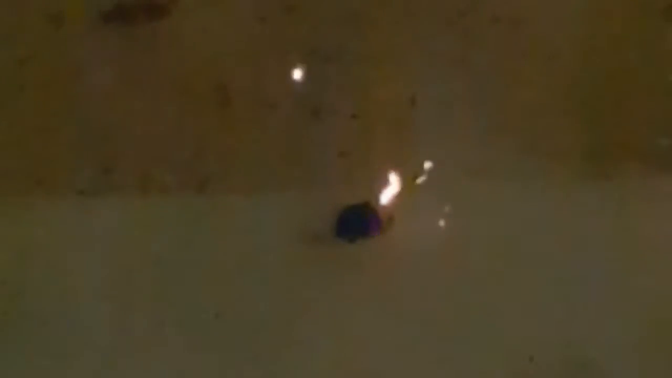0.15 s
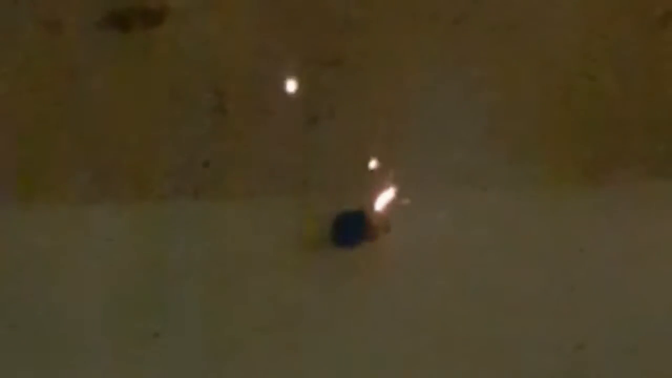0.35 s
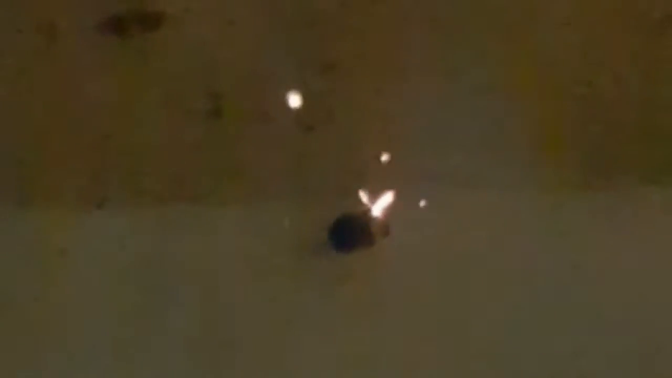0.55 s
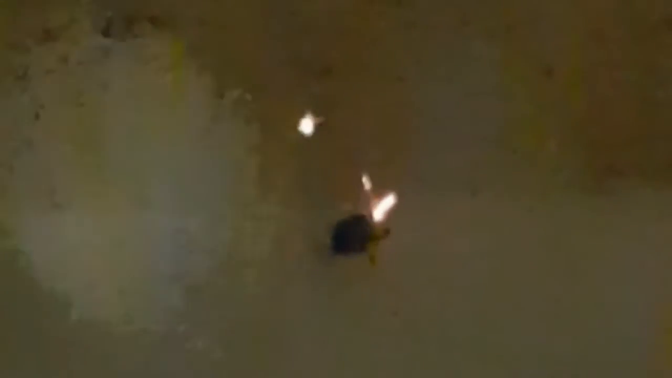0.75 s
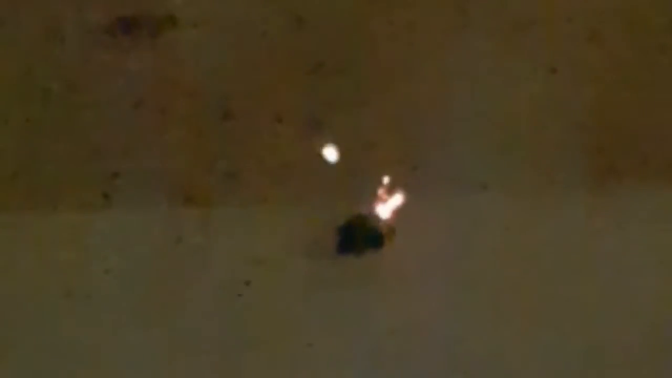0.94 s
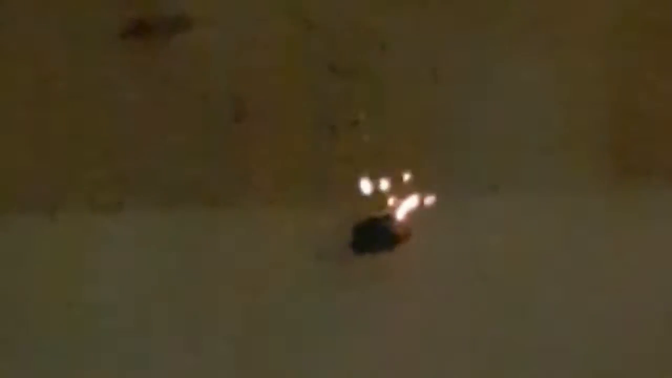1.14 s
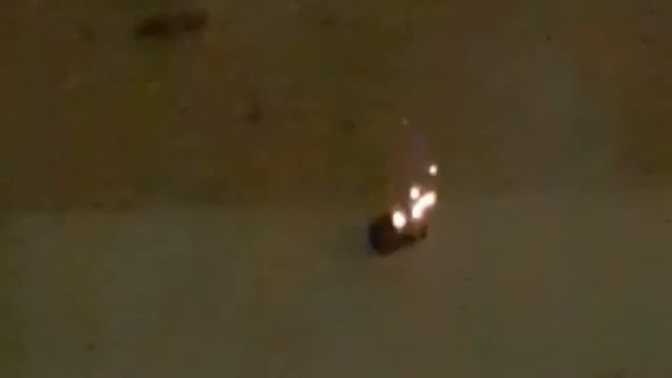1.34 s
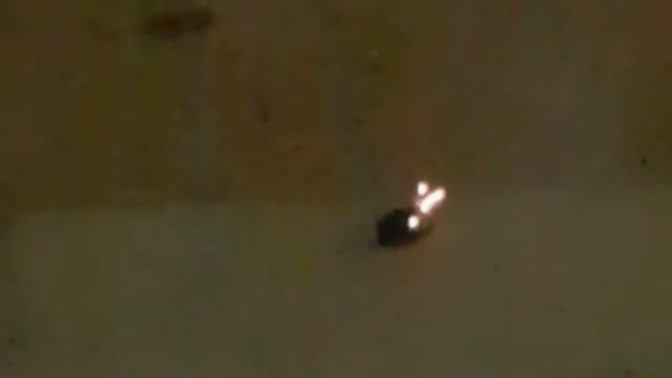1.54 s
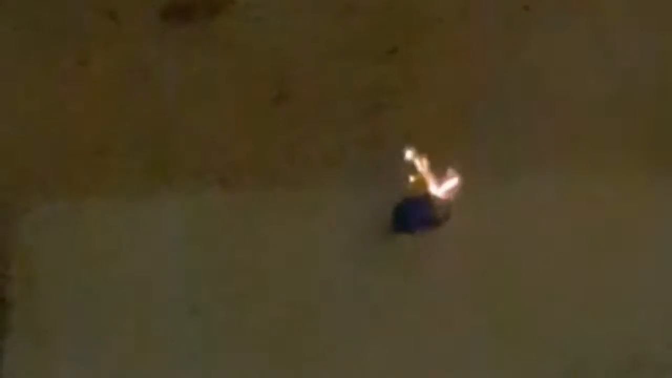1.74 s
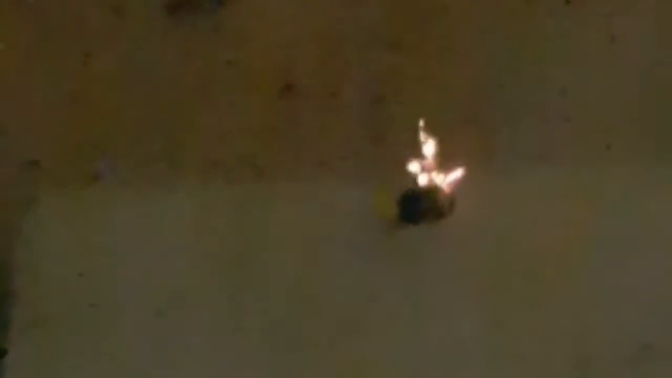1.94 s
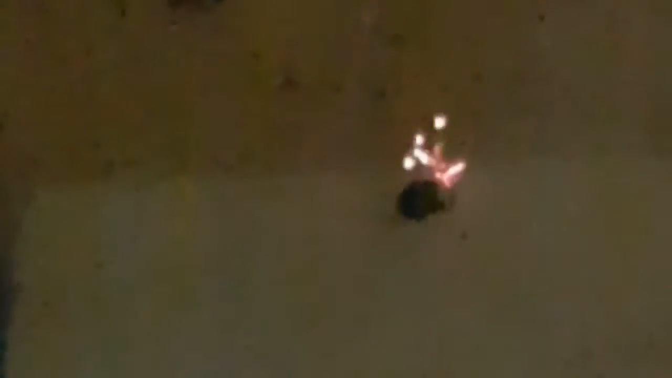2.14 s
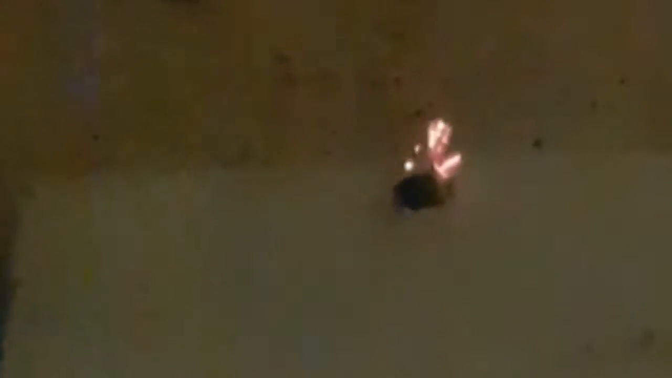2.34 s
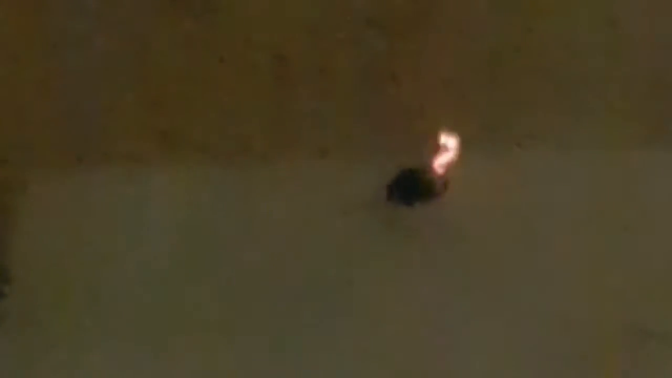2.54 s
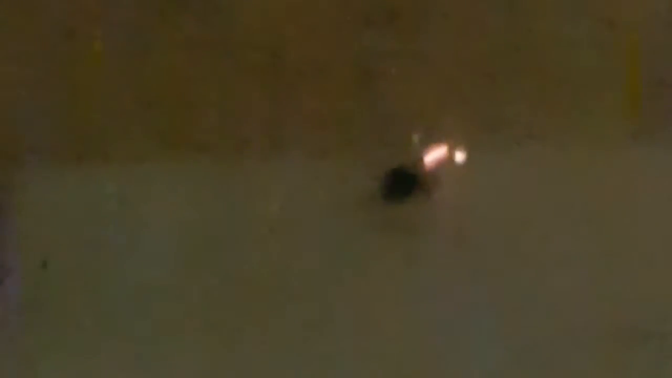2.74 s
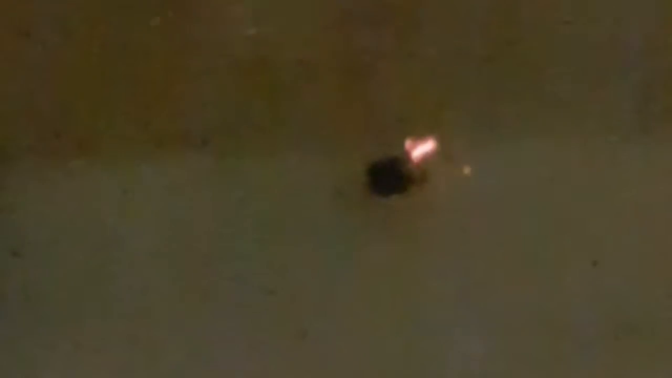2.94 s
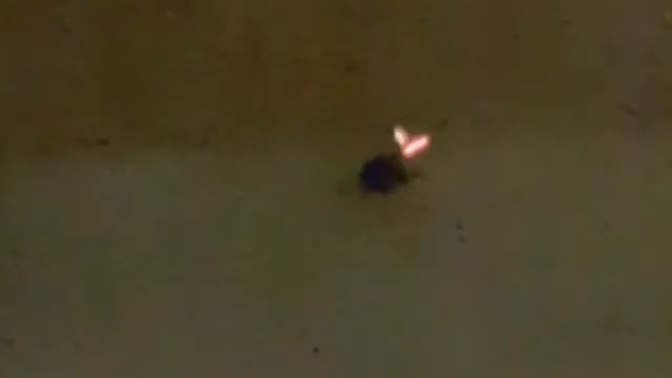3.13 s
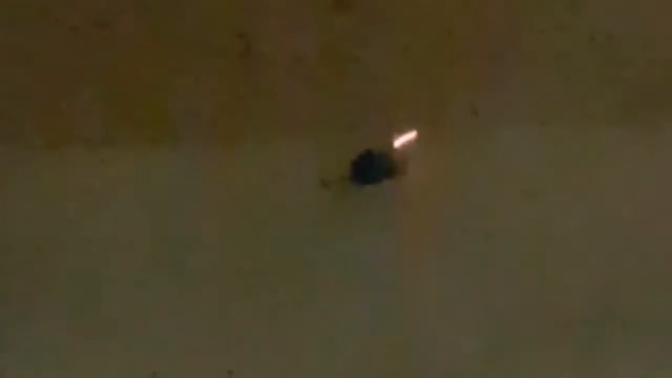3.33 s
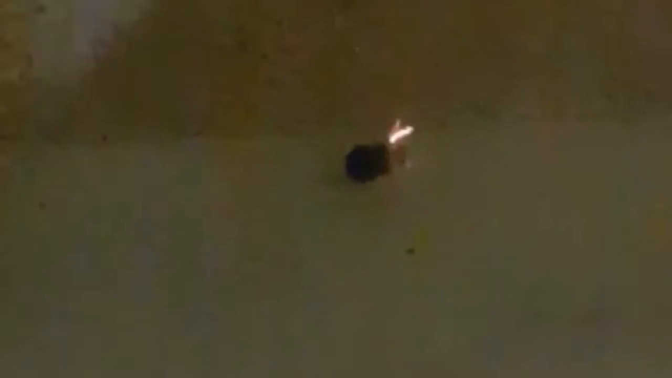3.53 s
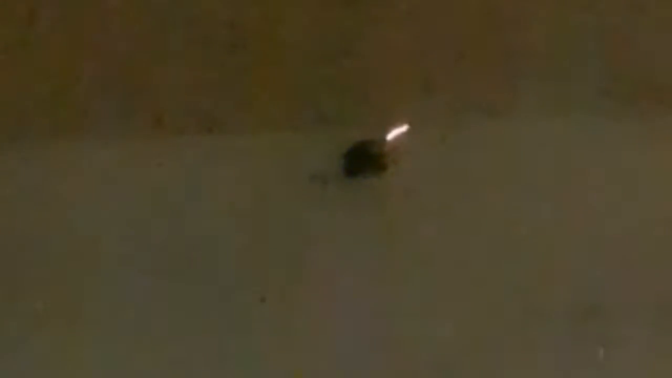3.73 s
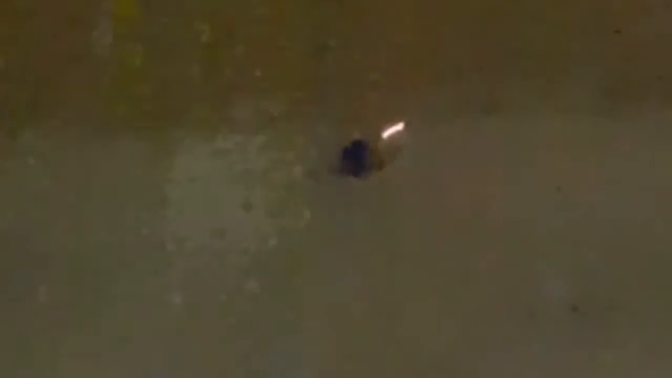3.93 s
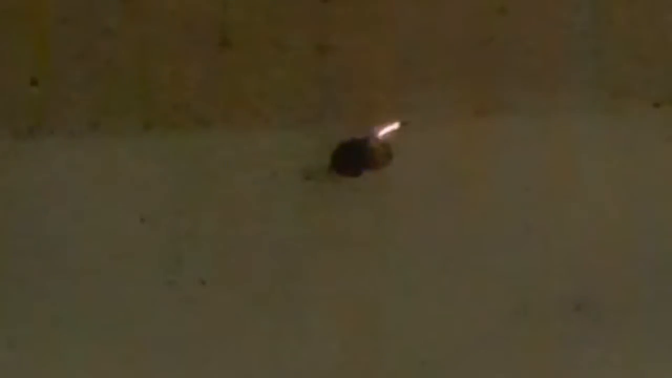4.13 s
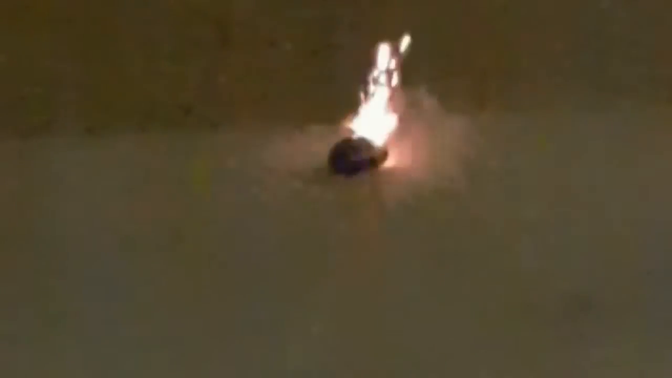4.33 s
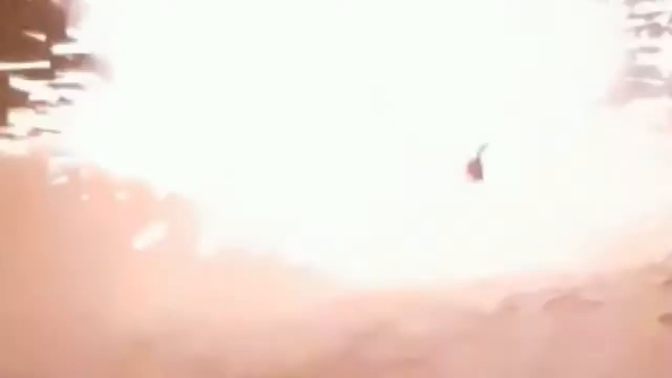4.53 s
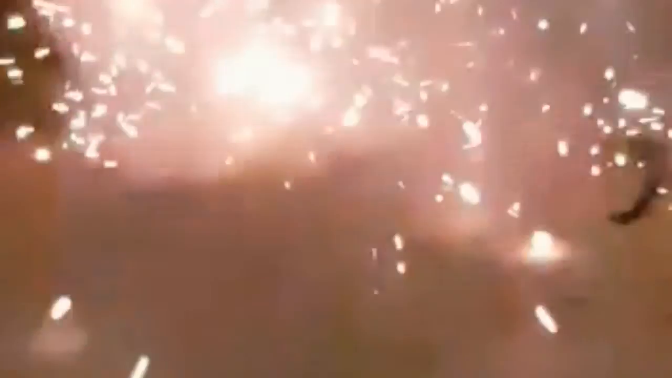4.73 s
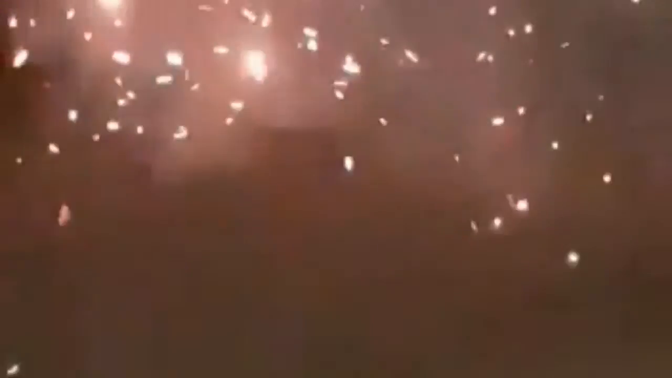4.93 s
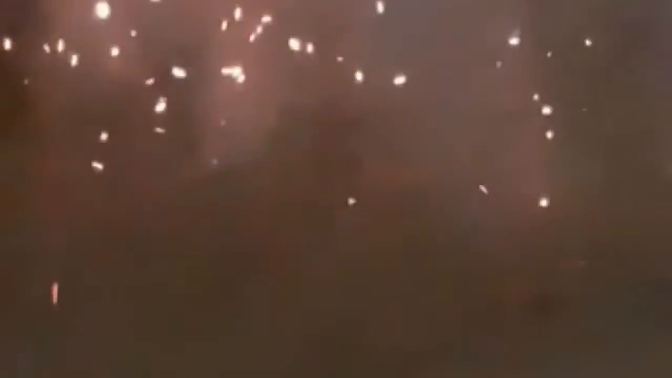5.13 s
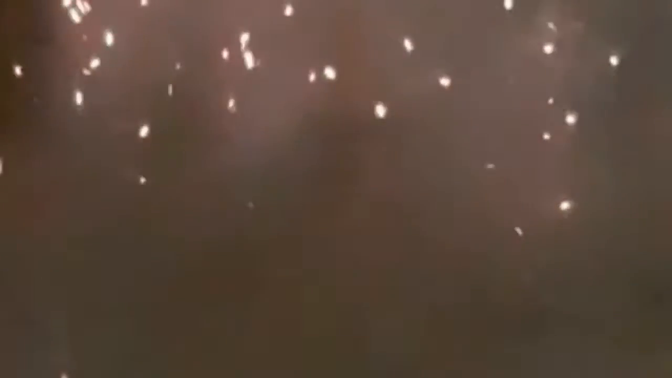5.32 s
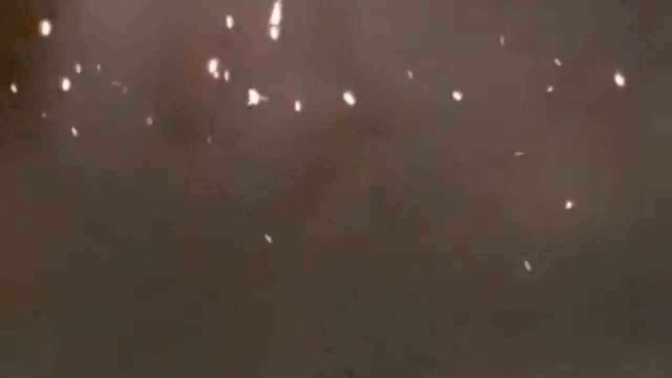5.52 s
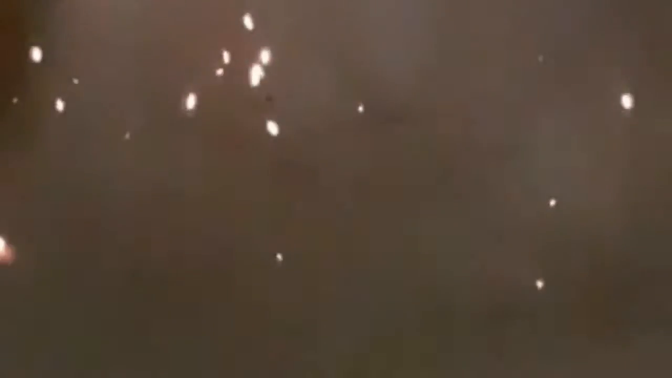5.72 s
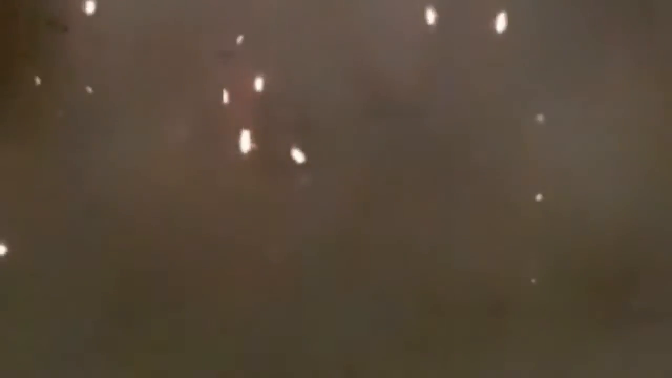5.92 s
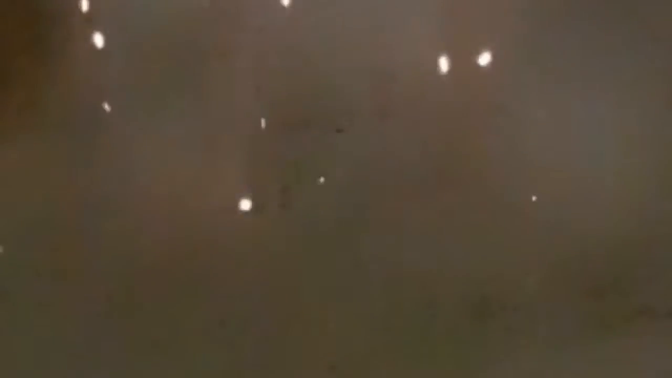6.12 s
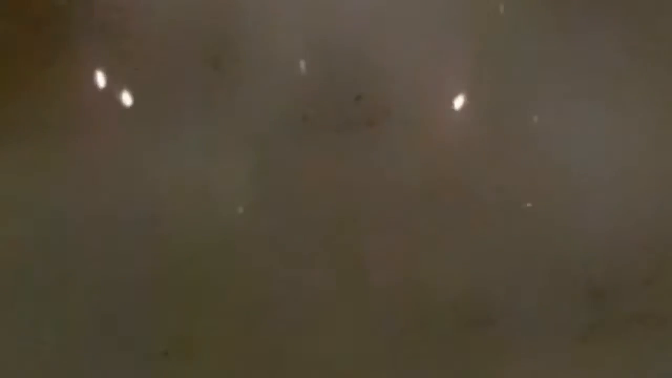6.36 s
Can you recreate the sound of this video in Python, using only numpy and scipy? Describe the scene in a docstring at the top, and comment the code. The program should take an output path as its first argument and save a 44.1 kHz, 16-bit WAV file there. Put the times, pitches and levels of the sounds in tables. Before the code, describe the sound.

A firecracker lies on the ground outdoors, its fuse fizzing softly and spitting occasional sparks. Distant town traffic rumbles behind it, with a low throbbing drone and a hollow whine. After several seconds the firecracker explodes with one sharp, very loud bang, and deep echoes roll back from nearby buildings and fade. The blast overloads the phone microphone, adding brief clicks; the sound is dull, with a thin treble sizzle.

```python
"""A twine-wrapped firecracker on the ground outdoors: the fuse fizzes and spits, then the powder blasts.
Town traffic rumbles behind it, with a low drone and a hollow whine. The casing cracks, the blast
fronts strike, and echoes roll back from the buildings.
The blast overloads a phone's microphones, adding short sharp clicks. The phone hears little above
4 kHz; its uneven sampling mirrors the sound into a thin treble sizzle."""
import sys
import numpy as np
from scipy import signal
from scipy.fft import rfft, irfft
from scipy.io import wavfile
from scipy.ndimage import uniform_filter1d, map_coordinates

SR = 44100
rng = np.random.default_rng(int(sys.argv[2]) if len(sys.argv) > 2 else 0)


def store_pcm(level_fs):
    """Save levels as 16-bit WAV."""
    pcm = np.round(np.clip(level_fs, -1, 1) * 32767).astype(np.int16)
    wavfile.write(sys.argv[1], SR, np.atleast_2d(pcm).T)


N = 286190
TIME_S = np.arange(N) / SR

# stereo width of diffuse sound: (frequency [Hz], side minus mid [dB])
WIDTH = [(50, -27.5), (130, -18), (260, -13.5), (500, -8.5), (2000, -7), (4000, -7)]
# traffic spectrum: (frequency [Hz], relative density [dB])
TOWN_SPECTRUM = [(15, 6), (25, 14), (60, -1.5), (95, -4), (140, -4.5), (210, -4.5), (300, -2.5),
                 (390, -2.5), (510, -4), (590, -7.5), (860, -9), (1050, -13.5), (1250, -12), (1600, -25.5)]
# drone throb contour: (time [s], relative level [dB])
DRONE_LEVELS = [(0.0, -42.5), (0.97, -42.5), (0.99, -50), (1.31, -40), (3.24, -37), (4.07, -50),
                (4.1, -36.5), (4.6, -34.5)]
# fizz spectrum: (frequency [Hz], relative density [dB])
FUSE_SPECTRUM = [(600, -50), (1400, 0.5), (1950, 8), (2300, 0), (2550, -4), (2900, -4), (3200, -12.5),
                 (3600, -12.5), (4300, -13.5), (7000, -22)]
# fuse sparks: (time [s], level [dB], decay [s], body re edge [dB])
SPITS = [(0.217, -64, 0.0025, -4), (0.531, -47, .016, -8), (0.545, -50, 0.013, 1), (0.594, -43, .003, -8),
         (0.601, -47.5, 0.022, -3), (0.756, -45, 0.0046, -4), (0.782, -44, .005, 2),
         (0.840, -33, 0.0026, 5), (1.355, -54, 0.017, 12), (3.050, -47, .012, 5), (3.085, -45, 0.0043, 9),
         (3.315, -49, 0.022, 3), (3.962, -46.5, 0.0097, -10), (4.067, -48, .004, -7),
         (4.255, -51, 0.018, -4)]
# blast fronts and echoes, plus two short sharp clicks (4.6646 s, 4.786 s) where the microphone overloads:
# (time [s], pressure gain [dB], push [s], crackle [dB], left minus right [dB])
PULSES = [(4.6404, -2, .00024, -3, 8), (4.643, 22, 0.0013, 2, 4.5), (4.6475, 11, 0.0017, -28, -11),
          (4.6526, 5, 0.0035, -35, 4), (4.6646, -2, 0.00026, -16, -22), (4.779, 1.5, 0.0054, -35, -9),
          (4.786, -12, 0.00027, -8.5, -1), (4.9445, 6, 0.0029, -18.5, 0.5), (4.999, 6, 0.0037, -25, 7),
          (5.0815, -4, 0.0015, -17, 6), (5.217, -1, 0.0025, -34, 13)]
# crackling wake spectrum: (frequency [Hz], relative density [dB])
WAKE_SPECTRUM = [(100, -15), (700, 10.5), (1300, 17), (1700, -5), (2100, 8), (2500, 15.5), (3000, -4.5),
                 (5000, -10), (9000, -18)]
# echo spectrum: (frequency [Hz], relative density [dB])
ROLL_SPECTRUM = [(12, -25), (22, 2), (45, 6), (129, -2), (190, -12.5), (377, -16), (600, -24),
                 (1080, -29.5), (1730, -39), (2670, -42.5), (3700, -52.5), (5000, -59), (7000, -61)]
# echoes off whole house fronts: (crest [s], half width [s], boom gain [dB], body and rasp gain [dB])
SWELLS = [(4.683, .025, 4.5, 7.5), (4.946, 0.016, -1, 5.5), (5.065, 0.033, -0.5, 6), (5.18, 0.014, 2, 4.5),
          (5.238, 0.034, 1, 6.5), (5.42, 0.047, 2.5, 3), (5.875, 0.09, 2.5, 5), (6.351, .02, 4, 2.5)]
# overload clicks, right microphone: (time [s], length [s])
SNAPS = [(4.6444, .0003), (4.6449, .0002), (4.6650, .0005), (4.6658, .001), (4.7865, .0003)]
# periodic sampling error: (frequency [Hz], amplitude [samples])
CLOCK_JITTER = [(4000, 0.28), (8000, 0.4), (12000, 1.26)]

BLAST_S = PULSES[0][0]


def undb(db):
    """Decibels to gain."""
    return 10 ** (np.asarray(db) / 20)


def unit(x):
    """Scale to unit rms."""
    return x / np.sqrt(np.mean(x ** 2))


def pan(db):
    """Stereo gains for a left minus right level."""
    return undb(np.array([[db], [-db]]) / 2)


def ramp(db, db_per_s):
    """Gain with a constant dB slope."""
    return undb(db + db_per_s * TIME_S)


def colour(x, points):
    """Filter by (frequency [Hz], gain [dB]) points."""
    hz, db = np.transpose(points)
    bins_hz = np.maximum(np.arange(N // 2 + 1) * SR / N, 1)
    return irfft(rfft(x) * undb(np.interp(np.log(bins_hz), np.log(hz), db)), N)


def band(x, low_hz, high_hz):
    """Zero-phase band-pass."""
    return signal.sosfiltfilt(signal.butter(3, [low_hz, high_hz], "band", fs=SR, output="sos"), x)


def steady(x, window_s):
    """Level slow swells to unit rms."""
    return x / np.sqrt(uniform_filter1d(np.mean(x ** 2, axis=0), int(window_s * SR)) + 1e-12)


def wander(rate_hz):
    """Random drift, spread near one."""
    knots = rng.standard_normal(400)
    return np.interp(TIME_S * rate_hz, np.arange(len(knots)), knots)


def grains(rate_hz, spread_db):
    """Two independent trains of uneven clicks."""
    clicks = (rng.random((2, N)) < rate_hz / SR) * rng.standard_normal((2, N))
    return unit(clicks * undb(spread_db * np.minimum(rng.exponential(size=(2, N)), 4)))


def diffuse(pair):
    """Sound from all around: long waves reach both microphones alike, short ones differ."""
    side = colour(pair[1], WIDTH)
    return np.array([pair[0] + side, pair[0] - side])


def town(flicker_db=1.5):
    """Distant traffic draws slowly nearer: rumble, roar and a lighter rush, all wavering."""
    air = colour(diffuse(rng.standard_normal((2, N))), TOWN_SPECTRUM)
    air = air / np.std(band(air, 236, 529))
    nearness = ramp(-39, db_per_s=0.76)
    rumble = (band(air, 57.6, 195.6) + undb(-5) * band(air, 11, 61)) * nearness
    roar = band(air, 178.4, 654) * nearness
    rush = unit(band(air, 673, 3270)) * ramp(-46.5, db_per_s=1.26)
    return (rumble + (roar + rush) * pan(-0.76)) * undb(flicker_db * wander(20))


def drone(hz=48.06, drift_hz=1.985, roughness=0.75, waver_db=4.0):
    """Unsteady low throb, perhaps a distant engine, with a growing third-harmonic hum."""
    phase = 2 * np.pi * np.cumsum(hz + drift_hz * wander(9)) / SR
    throb = unit(np.sin(phase)) + roughness * unit(band(rng.standard_normal(N), 22, 73))
    throb_db = 1.5 + np.interp(TIME_S, *np.transpose(DRONE_LEVELS))
    throb = steady(throb[None], window_s=0.25) * undb(throb_db)
    hum = unit(np.sin(3 * phase) * undb(waver_db * wander(10))) * ramp(-50.5, db_per_s=1.85)
    return (throb + hum) * pan(-2)


def whine(hz=390, width_hz=45, drift_hz=28, base_db=-46, swell_db=10.7, crest_s=4.33, half_width_s=0.43):
    """A hollow narrow-band note in the traffic wavers and swells once."""
    phase = 2 * np.pi * np.cumsum(hz + drift_hz * wander(10)) / SR
    note = unit(wander(width_hz) * np.cos(phase) + wander(width_hz) * np.sin(phase))
    swell = np.exp(-((TIME_S - crest_s) / half_width_s) ** 2)
    return note * undb(base_db + swell_db * swell) * pan(-6)


def fuse(flicker_db=3.7, ring_db=4):
    """Powder grains burn in a fine fizz; now and then a spark spits out."""
    fizz = unit(colour(diffuse(grains(rate_hz=6000, spread_db=0.5)), FUSE_SPECTRUM))
    out = fizz * ramp(-53.5, db_per_s=-0.02) * undb(flicker_db * wander(30.25))
    noise = diffuse(rng.standard_normal((2, N)))
    edge = unit(band(noise, 1600, 4060) + undb(ring_db) * band(noise, 2530, 2800))
    body = unit(band(noise, 930, 1750))
    age_s = TIME_S[:SR // 8]
    for start_s, level_db, decay_s, body_db in SPITS:
        span = slice(int(start_s * SR), int(start_s * SR) + len(age_s))
        spark = edge[:, span] + undb(body_db) * body[:, span]
        out[:, span] += undb(level_db) * np.exp(-age_s / decay_s) * spark
    return out * pan(-2)


def casing(ring_hz=2100, decay_s=0.0012, level_db=2):
    """The wrapping splits with a ringing crack just ahead of the main front."""
    age_s = np.maximum(TIME_S - BLAST_S, 0)
    return undb(level_db) * np.sin(2 * np.pi * ring_hz * age_s) * np.exp(-age_s / decay_s)


def blast(rounding_s=0.038, early_rise_s=0.00006, late_rise_s=0.00081,
          early_wake_s=0.0028, late_wake_s=0.0029):
    """Blast fronts, echoes and two overload clicks: jump, undershoot, crackle. Later ones are rounder."""
    wake = unit(colour(diffuse(rng.standard_normal((2, N))), WAKE_SPECTRUM))
    out = np.zeros((2, N))
    age_s = TIME_S[:SR // 8]
    for start_s, pressure_db, push_s, crackle_db, pan_db in PULSES:
        span = slice(int(start_s * SR), int(start_s * SR) + len(age_s))
        late = 1 - np.exp(-((start_s - BLAST_S) / rounding_s) ** 2)
        rise_s = early_rise_s + late * (late_rise_s - early_rise_s)
        wake_s = early_wake_s + late * (late_wake_s - early_wake_s)
        jump = 1 - np.exp(-(age_s / rise_s) ** 2)
        pulse = undb(pressure_db) * jump * (1 - age_s / push_s) * np.exp(-age_s / push_s)
        crackle = undb(crackle_db) * np.exp(-age_s / wake_s) * wake[:, span]
        out[:, span] += (pulse + crackle) * pan(pan_db)
    return out


def roll(start_s=4.679, hold_s=0.71, attack_s=0.003, build_s=0.0053, throb_hz=21.9,
         fall_db_per_s=17, rasp_fall_db_per_s=27):
    """Dense echoes off walls and roofs hold, swell and die away; later ones are duller."""
    echoes = colour(diffuse(grains(rate_hz=6500, spread_db=1.2)), ROLL_SPECTRUM)
    age_s = np.maximum(TIME_S - start_s, 0)
    fading_s = np.maximum(age_s - hold_s, 0)
    low_db = high_db = 1.5 * wander(throb_hz)
    for crest_s, half_width_s, boom_db, body_db in SWELLS:
        swell = np.exp(-((TIME_S - crest_s) / half_width_s) ** 2)
        low_db = low_db + boom_db * swell
        high_db = high_db + body_db * swell
    # with travel, the deepest waves gain share and air absorbs treble
    deep = band(echoes, 24, 63) * undb(4 * age_s - 2)
    treble = band(echoes, 2330, 7100) * undb(2 - 3 * age_s)
    boom = steady(deep + band(echoes, 70, 230), window_s=0.05)
    body = steady(band(echoes, 200, 950), window_s=0.06)
    rasp = steady(band(echoes, 900, 2600) + treble, window_s=0.03)
    boom *= undb(-10 - fall_db_per_s * fading_s + low_db)
    body *= undb(-23 - fall_db_per_s * fading_s + high_db)
    rasp *= undb(-35 - rasp_fall_db_per_s * fading_s + high_db)
    attack = np.minimum(age_s / attack_s, 1)
    build = 1 - np.exp(-age_s / build_s)
    return boom * build + (body + rasp) * pan(-2) * attack


def thump(start_s=4.712, start_hz=240, glide_per_s=12, decay_s=0.014, level_db=-2, flicker_db=3.4):
    """The space between the nearest walls answers with a hollow, falling thump."""
    age_s = np.maximum(TIME_S - start_s, 0)
    pitch_hz = start_hz * np.exp(-glide_per_s * age_s) * (age_s > 0)
    phase = 2 * np.pi * np.cumsum(pitch_hz) / SR
    return undb(level_db + flicker_db * wander(40)) * np.sin(phase) * np.exp(-age_s / decay_s)


def scene(dip_start_s=4.61, dip_fall_s=0.03, dip_db=-11.5, recover_db_per_s=1):
    """Town and fuse, then blast and echoes. The background dips just before the blast and creeps back."""
    burning = TIME_S < BLAST_S
    dip_age_s = np.maximum(TIME_S - dip_start_s, 0)
    dip = undb(dip_db * np.minimum(dip_age_s / dip_fall_s, 1) + recover_db_per_s * dip_age_s)
    background = (town() + drone() + whine() + fuse() * burning) * dip
    return background + casing() + blast() + thump() + roll()


def record(dry, rail=0.88, treble_hz=4300, top_hz=15700):
    """Phone: microphones overload, treble is cut, uneven sampling mirrors the rest upwards."""
    clipped = dry / (1 + (dry / rail) ** 10) ** (1 / 10)
    for start_s, length_s in SNAPS:  # flip to the opposite rail
        start = int(start_s * SR)
        clipped[1, start:start + int(length_s * SR)] = -rail * np.sign(clipped[1, start])
    dull = signal.sosfilt(signal.bessel(3, treble_hz, norm="mag", fs=SR, output="sos"), clipped)
    slip_samples = sum(size * np.cos(2 * np.pi * hz * TIME_S) for hz, size in CLOCK_JITTER)
    slip_samples += 0.18 * rng.standard_normal(N)
    instants = np.arange(N) + slip_samples
    sampled = np.array([map_coordinates(side, [instants], order=3, mode="nearest") for side in dull])
    return signal.sosfilt(signal.ellip(8, 0.2, 70, top_hz, fs=SR, output="sos"), sampled)


dry = scene()
out = record(dry)
store_pcm(out)
```